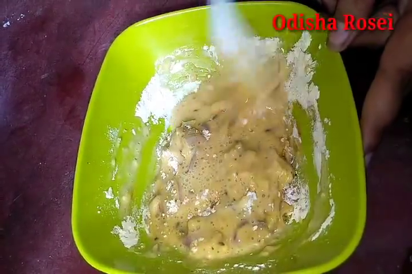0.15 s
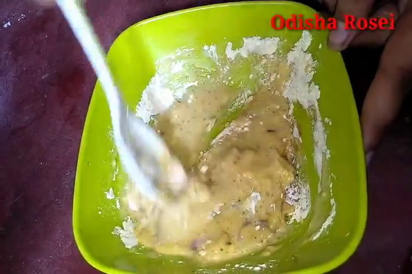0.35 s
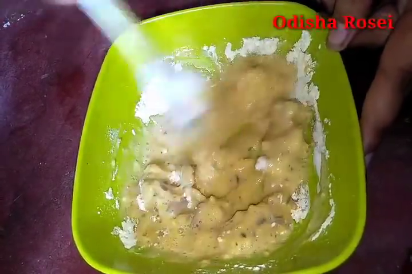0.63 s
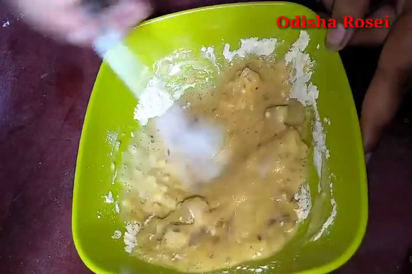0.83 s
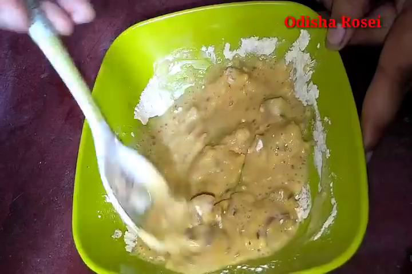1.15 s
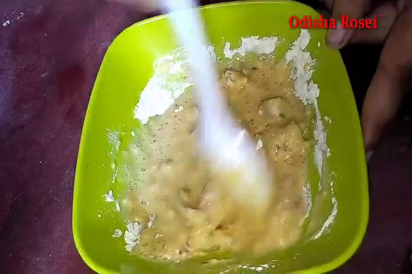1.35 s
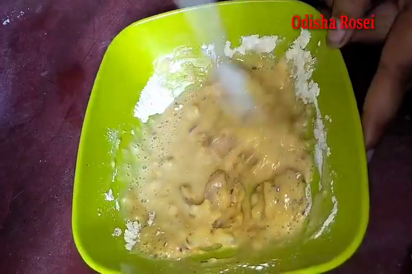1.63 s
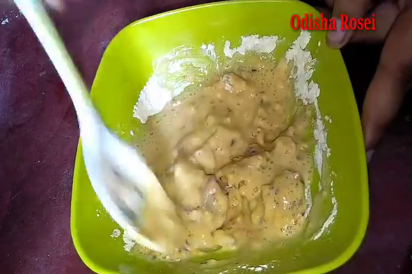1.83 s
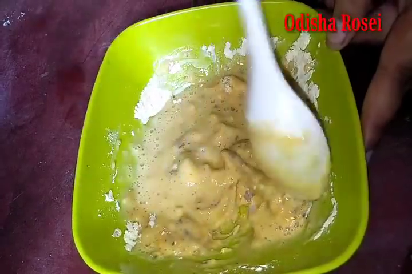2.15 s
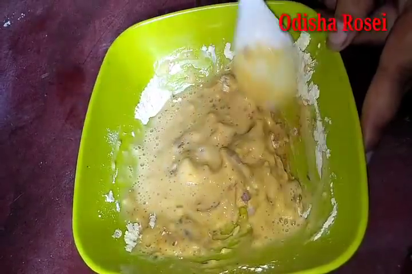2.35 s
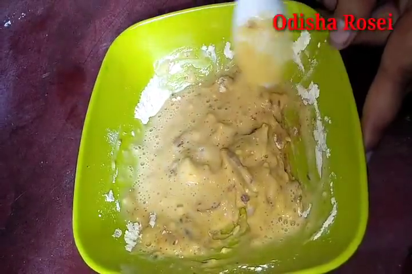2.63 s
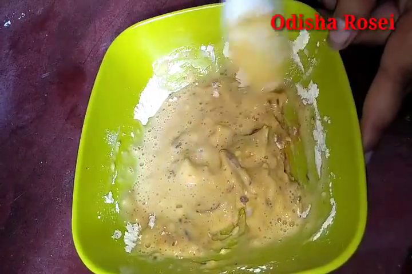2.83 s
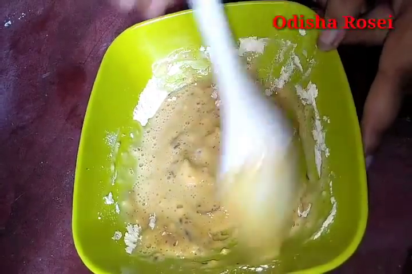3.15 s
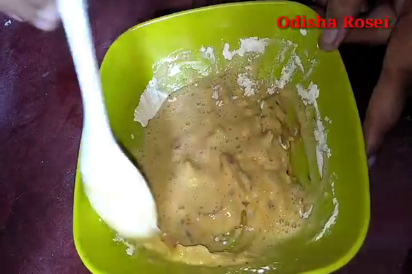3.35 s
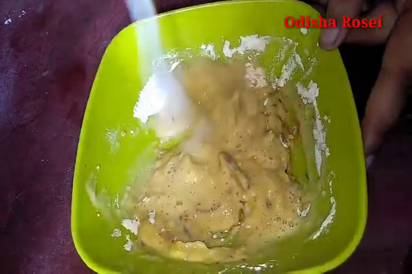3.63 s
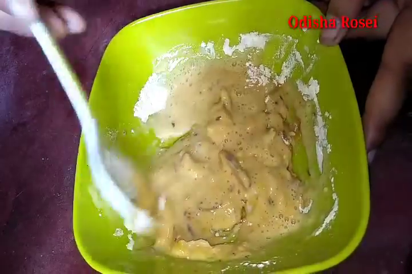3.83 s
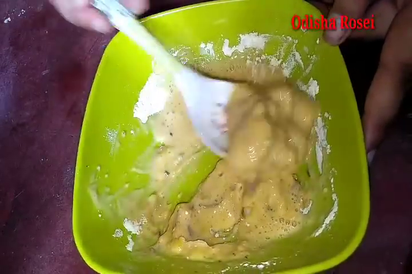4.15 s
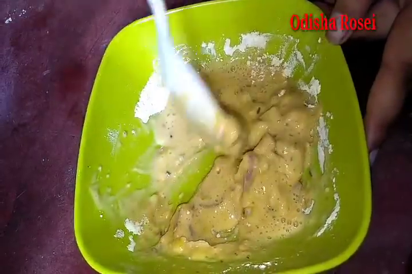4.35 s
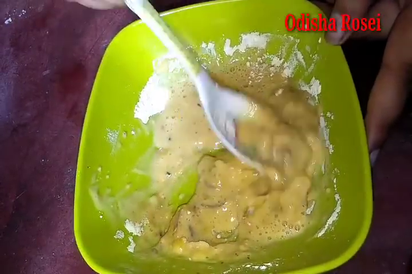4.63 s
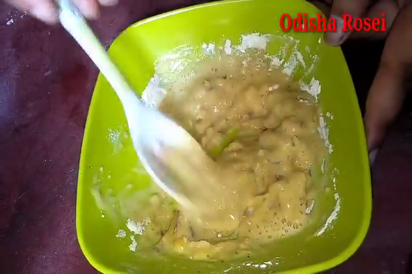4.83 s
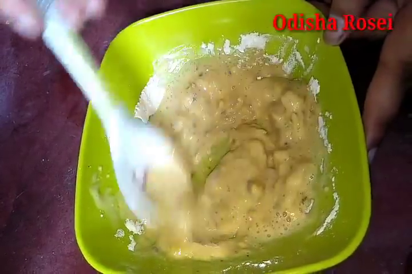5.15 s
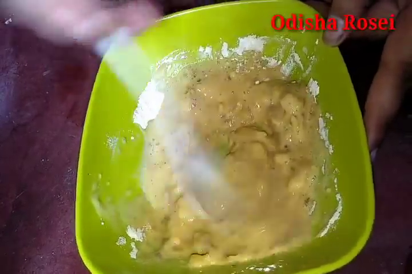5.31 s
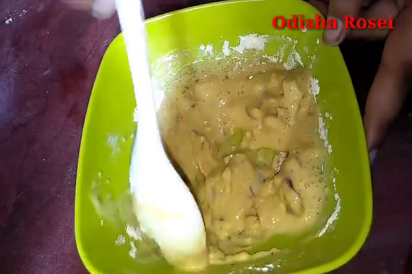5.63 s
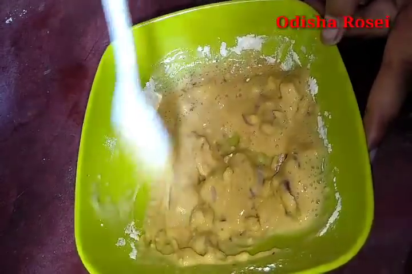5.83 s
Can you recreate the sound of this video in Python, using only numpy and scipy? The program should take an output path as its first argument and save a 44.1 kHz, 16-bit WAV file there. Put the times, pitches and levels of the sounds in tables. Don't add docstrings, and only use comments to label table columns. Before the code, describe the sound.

A plastic spoon stirs thick batter in a plastic bowl with dull thuds, sharp raps and sticky scrapes over a low room rumble.

```python
import sys
import numpy as np
from scipy import signal
from scipy.fft import rfft, irfft, next_fast_len
from scipy.io import wavfile
from scipy.ndimage import map_coordinates

SR = 44100
rng = np.random.default_rng(int(sys.argv[2]) if len(sys.argv) > 2 else 0)


def to_wav(sig):
    pcm = np.clip(np.atleast_2d(sig), -1, 1) * 32767
    pcm = np.round(pcm).astype(np.int16)
    wavfile.write(sys.argv[1], SR, pcm.T)


def gain_from_db(level_db):
    decades = np.asarray(level_db, float) / 20
    return 10 ** decades


N = 263788


def along(points, hz):
    f, v = np.transpose(points)
    return np.interp(np.log(hz + 1), np.log(f + 1), v)


def unit(x):
    return x / np.sqrt(np.mean(x ** 2) + 1e-20)


def curves(rows):
    s, *cols = np.transpose(rows)
    return [np.interp(np.arange(N) / SR, s, c) for c in cols]


def wobble(knots_per_s):
    knots = rng.standard_normal(int(N * knots_per_s / SR) + 4)
    return map_coordinates(knots, [np.arange(N) * knots_per_s / SR])


def filtered(x, response):
    m = next_fast_len(x.shape[-1] + 8192)
    spectrum = rfft(x, m) * response(np.fft.rfftfreq(m, 1 / SR))
    return irfft(spectrum, m)[..., :x.shape[-1]]


def noise(spectrum):
    return unit(filtered(rng.standard_normal(N), lambda hz: gain_from_db(along(spectrum, hz))))


def body(modes):
    low, high = modes[0][0] * 0.55, modes[-1][0] * 1.77

    def response(f):
        highpass = (1j * f / low) ** 2 / (1 - (f / low) ** 2 + 1.3j * f / low)
        lowpass = 1 / (1 - (f / high) ** 2 + 1.3j * f / high)
        total = 0
        for k, (centre, width, db) in enumerate(modes):
            damping = 1j * f * width
            total = total + (-1) ** k * gain_from_db(db) * damping / (centre * centre - f * f + damping)
        return (highpass * lowpass) ** 3 * total

    return response


# frequency in Hz, t60 in s.
KITCHEN_T60 = [(300, 0.28), (800, 0.25), (2100, 0.26), (5500, 0.16), (12000, 0.28)]
TAIL = 16384


def tails(count):
    hz, t, z = signal.stft(rng.standard_normal((count, TAIL)), SR, nperseg=256)
    decay = gain_from_db(-60 * t / along(KITCHEN_T60, hz)[:, None])
    tail = signal.istft(z * decay, SR, nperseg=256)[1][:, :TAIL]
    tail = tail * np.clip(np.arange(TAIL) / SR / 0.0015, 0, 1) ** 2
    return tail / np.linalg.norm(tail, axis=1, keepdims=True)


def in_kitchen(starts_s, dry, wet_db):
    dry = np.pad(dry, [(0, 0), (0, TAIL - dry.shape[1])])
    heard = dry + gain_from_db(wet_db) * signal.fftconvolve(dry, tails(count=len(dry)), axes=1)[:, :TAIL]
    out = np.zeros(N + TAIL)
    for s, one in zip(starts_s, heard):
        out[round(s * SR):][:TAIL] += one
    return out[:N]


# time in s, level in dB.
RUMBLE_SWELLS = [(0.03, -48), (0.49, -58), (0.51, -52), (1.5, -50.5), (1.6, -59.5), (2.04, -55.5),
                 (2.07, -49.5), (2.5, -55.5), (2.54, -50), (2.7, -59.5), (2.88, -52), (2.98, -59),
                 (3.57, -60), (4.37, -53.5), (4.93, -56.5), (5.03, -64), (5.06, -53), (5.95, -52)]
# frequency in Hz, density in dB per Hz.
DEEP_SPECTRUM = [(12, -26), (20, -18.5), (43, 0), (75, -7), (91, -4), (110, -5), (140, -36), (240, -120)]
HUM_SPECTRUM = [(41, -17.5), (70, -10), (102, 2.5), (129, 2), (161, 2), (188, -4.5), (220, -7),
                (314, -24.5), (343, -28), (420, -48), (550, -82.5), (920, -120)]
HISS_SPECTRUM = [(210, -48.5), (350, 0), (591, -6), (1920, -11.5), (2180, -10.5), (4110, -16), (5640, -15),
                 (6210, -38), (6830, -13), (7750, -16), (15600, -12.5)]
DEEP_DB, DEEP_FOLLOWS, HISS_DB = -57, 0.4, -75.5


def room_tone():
    hum_db, = curves(RUMBLE_SWELLS)
    deep_db = DEEP_DB + DEEP_FOLLOWS * (hum_db - hum_db.mean())
    deep = gain_from_db(deep_db) * unit(gain_from_db(2.1 * wobble(7.2)) * noise(DEEP_SPECTRUM))
    hum = gain_from_db(hum_db) * unit(gain_from_db(2.73 * wobble(16)) * noise(HUM_SPECTRUM))
    hiss = gain_from_db(HISS_DB + 0.86 * wobble(0.92)) * noise(HISS_SPECTRUM)
    return deep + hum + hiss


# time in s, peak in dB.
NEAR_SWELLS = [(0.17, -72.5), (1.4, -73), (1.55, -84.5), (1.93, -87), (3.401, -73.5), (4.01, -74.5),
               (5.52, -70.5)]
NEAR_REST_DB, NEAR_FADE_DB_PER_S = -86.5, 40


def near_insect_db():
    t = np.arange(N) / SR
    swells = [np.maximum(db - NEAR_FADE_DB_PER_S * abs(t - s), NEAR_REST_DB) for s, db in NEAR_SWELLS]
    return np.max(swells, axis=0)


# centre in Hz, width in Hz, level in dB.
FAR_INSECTS = [(6003, 80, -82.5), (7863, 90, -85.5), (11400, 240, -97.5)]
NEAR_HZ, NEAR_WIDTH_HZ = 6380, 110


def insects():
    out = 0
    for hz, width, db in FAR_INSECTS + [(NEAR_HZ, NEAR_WIDTH_HZ, near_insect_db())]:
        band = lambda f: 1 / (1 + ((f - hz) / width) ** 4)
        trill = unit(filtered(rng.standard_normal(N), band))
        out = out + gain_from_db(db + 3.9 * wobble(3.7) + 2.7 * wobble(30)) * trill
    return out


# time in s, pitch in Hz, level in dB, overtone in dB.
CHIRP = [
    (1.12, 2240, -103, -7),
    (1.135, 2500, -68.5, -4),
    (1.16, 2774, -56.5, -13),
    (1.2, 2753, -63.5, 3),
    (1.24, 2670, -67, -0.5),
    (1.29, 2690, -71, -9),
    (1.34, 2650, -77, -16),
    (1.42, 2600, -98, -10),
]


def bird():
    hz, db, over_db = curves(CHIRP)
    t = np.arange(N) / SR
    phase = 2 * np.pi * np.cumsum(.99 * hz * (1 + 0.058 * wobble(300))) / SR
    voice = np.sin(phase) + gain_from_db(over_db) * np.sin(2 * phase)
    voice = voice * gain_from_db(db + 2.4 * wobble(90))
    voice = voice * (t > CHIRP[0][0]) * (t < CHIRP[-1][0])
    return voice + 1.48 * signal.fftconvolve(voice, tails(count=1)[0])[:N]


# centre in Hz, width in Hz, level in dB.
BOTTOM_MODES = [(400, 150, 1.5), (537, 140, 6), (734, 142, 3.5), (956, 140, 2.5)]
WALL_MODES = [(1186, 240, 0.027), (1380, 210, 0), (1586, 120, 0.0047)]
RIM_MODES = [(2110, 230, 0.021), (2650, 120, 0.00068), (2950, 180, 0.0014)]
SPOON_MODES = [(4720, 415, -3), (5450, 220, -1), (6250, 620, 1.5), (8200, 2000, -12.5)]
SMACK_MODES = [(9900, 4200, -15), (11400, 1200, -4.5)]
# time in s, pressure in dB, height from -1 (bottom) to 1 (rim).
DRAG_PATH = [(0.0, -79, 0.61), (0.85, -72.5, -0.15), (1.1, -84, 0.4), (1.75, -86.5, -1.2), (2.5, -78, 0),
             (3.1, -77, -0.7), (3.25, -55, .3), (3.4, -60, 0.19), (3.5, -70.5, 1), (3.66, -82, -0.96),
             (3.95, -69.5, 0.86), (4.2, -79.5, 0.15), (5.09, -80.5, 0.67), (5.3, -59, 0.62),
             (5.48, -64.5, 1), (5.66, -70, 0), (5.8, -50, -0.45), (5.98, -66.5, -1)]
# level at mid height in dB, slope in dB per unit height.
HEIGHT_LEVELS = [
    (-1, -10.5),
    (-2, 7.5),
    (-6, 5.5),
    (-14.5, 4),
]


def drag(per_s=1500, scatter_db=2.5):
    out = 0
    pressure_db, height = curves(DRAG_PATH)
    groups = [BOTTOM_MODES, WALL_MODES + RIM_MODES, SPOON_MODES, SMACK_MODES]
    for (mid_db, slope_db), group in zip(HEIGHT_LEVELS, groups):
        db = pressure_db + mid_db + slope_db * height
        slips = (rng.random(N) < per_s / SR) * rng.standard_normal(N)
        slips = slips * gain_from_db(scatter_db * rng.exponential(size=N))
        smeared = slips + 4.0 * signal.fftconvolve(slips, tails(count=1)[0])[:N]
        out = out + gain_from_db(db - 10.5) * unit(filtered(smeared, lambda f: body(group)(f) ** 2))
    return out


# start in s, length in s, resonance in Hz, level in dB.
BOTTOM_RUBS = [(3.176, 0.018, 1014, -35.5), (0.634, 0.026, 780, -68), (0.686, 0.042, 885, -71.5),
               (0.772, 0.039, 850, -65.5), (0.935, 0.027, 460, -53.5), (1.902, 0.025, 920, -64),
               (1.905, 0.028, 372, -56.5), (2.5, 0.063, 340, -46), (2.86, 0.063, 266, -46.5),
               (3.378, 0.021, 502, -62.5), (3.385, 0.11, 918, -60), (3.48, 0.089, 456, -62),
               (3.487, 0.078, 850, -56.5), (3.709, 0.11, 726, -69), (3.742, 0.025, 537, -59),
               (3.82, 0.077, 730, -68), (3.99, 0.037, 407, -72), (4.144, 0.042, 400, -68),
               (4.808, 0.033, 510, -75), (5.198, 0.063, 916, -51.5), (5.22, 0.03, 622, -50.5),
               (5.41, 0.08, 990, -60.5)]
BOWL_WALL_RUBS = [(2.19, 0.066, 1600, -55.5), (0.159, 0.031, 1330, -51), (0.165, 0.038, 2160, -65),
                  (0.475, 0.047, 1484, -67), (0.483, 0.07, 2150, -77), (0.626, 0.031, 1525, -64),
                  (0.783, 0.15, 2170, -74.5), (0.836, 0.07, 1385, -70), (0.939, 0.076, 1460, -62),
                  (1.608, 0.083, 1427, -72), (2.057, 0.022, 1580, -74.5), (2.323, 0.022, 1380, -74),
                  (2.544, 0.057, 1880, -53.5), (2.643, 0.037, 2190, -71), (3.43, 0.22, 1480, -71),
                  (3.45, 0.1, 2150, -69), (3.52, 0.023, 1400, -53.5), (3.754, 0.025, 2100, -71.5),
                  (3.865, 0.15, 1574, -66.5), (3.868, 0.14, 2110, -72), (4.089, 0.016, 1565, -70.5),
                  (4.218, 0.14, 2146, -77.5), (4.716, 0.068, 1533, -72), (4.909, 0.05, 2175, -74.5),
                  (5.068, 0.06, 1530, -74), (5.113, 0.26, 2160, -80.5), (5.216, 0.041, 1360, -57.5),
                  (5.315, 0.32, 2160, -67.5), (5.779, 0.18, 2120, -61)]
BOWL_RIM_RUBS = [(5.621, 0.011, 3000, -36), (3.175, 0.016, 3104, -34.5), (2.553, 0.058, 2750, -64.5),
                 (3.2, 0.17, 3094, -60.5), (5.647, 0.11, 3200, -62), (0.159, 0.032, 2670, -55.5),
                 (0.47, 0.065, 2650, -67), (0.628, 0.079, 2650, -70.5), (0.854, 0.2, 3420, -81.5),
                 (0.938, 0.059, 2770, -67), (1.588, 0.033, 3170, -70.5), (1.909, 0.025, 2950, -65),
                 (2.188, 0.09, 3430, -74), (2.872, 0.028, 2230, -48.5), (3.404, 0.12, 3520, -69.5),
                 (3.497, 0.057, 2650, -59.5), (3.866, 0.062, 2780, -58), (4.084, 0.026, 3660, -71.5),
                 (4.285, 0.12, 2470, -84), (4.697, 0.17, 2390, -81), (4.962, 0.1, 2780, -80.5),
                 (5.041, 0.14, 2530, -79.5), (5.197, 0.12, 2830, -63.5), (5.309, 0.21, 2460, -67),
                 (5.869, 0.12, 2510, -67)]
SPOON_BODY_RUBS = [(0.165, 0.022, 5270, -58.5), (0.476, 0.052, 4870, -70.5), (1.264, 0.017, 9200, -74),
                   (1.316, 0.013, 4870, -66.5), (1.373, 0.011, 5070, -67), (1.302, 0.68, 11250, -84.5),
                   (2.206, 0.15, 4660, -72), (2.214, 0.057, 8440, -74.5), (2.523, 0.13, 4970, -70.5),
                   (3.195, 0.16, 8500, -84), (3.298, 0.32, 6400, -74.5), (3.387, 0.14, 11600, -75.5),
                   (3.423, 0.16, 4530, -69), (3.757, 0.03, 4510, -74), (3.859, 0.087, 4850, -69),
                   (3.863, 0.069, 6660, -61.5), (3.986, 0.019, 4790, -70), (4.602, 0.06, 6580, -68.5),
                   (4.717, 0.086, 11610, -74.5), (5.229, 0.06, 4400, -69.5), (5.621, 0.039, 6050, -60),
                   (3.485, 0.049, 4940, -64), (0.938, 0.049, 4600, -77.5), (2.194, 0.12, 11600, -78.5),
                   (2.517, 0.2, 11700, -84), (3.873, 0.16, 11700, -78), (5.752, 0.11, 11800, -75),
                   (5.31, 0.22, 5060, -74.5), (5.817, 0.13, 4640, -72.5)]
# width in Hz at the usual level, widening in dB per dB louder.
RESONANCE_WIDTHS = [
    (240, 0.02),
    (270, 0.6),
    (450, 0.3),
    (1100, 0.88),
]
USUAL_RUB_DB = -68


def rubs(per_s=2200, scatter_db=3.5, rise_s=0.0021):
    parts = [BOTTOM_RUBS, BOWL_WALL_RUBS, BOWL_RIM_RUBS, SPOON_BODY_RUBS]
    s, length, hz, db = np.concatenate(parts).T[:, :, None]
    usual, wider = np.repeat(RESONANCE_WIDTHS, [len(p) for p in parts], axis=0).T[:, :, None]
    width = usual * gain_from_db(wider * (db - USUAL_RUB_DB))
    t = np.arange(TAIL * 3 // 4) / SR
    shape = (len(s), len(t))
    slips = (rng.random(shape) < per_s / SR) * rng.standard_normal(shape)
    slips = slips * gain_from_db(scatter_db * rng.exponential(size=shape))
    stroke = (1 - np.exp(-t / rise_s)) * np.clip(1 - (t / length) ** 2, 0, 1)
    resonance = lambda f: (1j * f * width / (hz * hz - f * f + 1j * f * width)) ** 3
    sung = filtered(slips * stroke, resonance)
    rms = np.sqrt(np.sum(sung ** 2, axis=1, keepdims=True) / (length * SR) + 1e-20)
    return in_kitchen(s[:, 0], gain_from_db(db - 2.5) * sung / rms, wet_db=-4.0)


# start in s, peak in dB, wall in dB against the bottom, hardness in dB.
THUD_BLOWS = [(0.151, -40.5, -10, -1), (0.931, -44.5, -47, 5), (1.593, -40, -43, 1), (2.176, -39.5, 5, -24),
              (2.501, -31.5, -17, 8), (2.511, -29.5, -6.5, -17), (2.523, -32, -7.5, 1),
              (2.847, -34, -16, -15.5), (2.857, -17.5, -2.5, -5), (2.881, -30, -14.5, 15),
              (2.889, -35, 7, -29), (2.894, -35.5, -15.5, -46), (5.201, -57, -28, 17),
              (5.305, -35, -12, -12.5), (5.755, -28, -4, 9), (5.848, -37.5, -3.5, 11)]
THUD_RIM_DB, THUD_SPOON_DB, THUD_TIP_DB, THUD_SMACK_DB = -23, -31, -47.5, -44
# start in s, peak in dB, height as dB of rim over bottom, spoon ring in dB.
RAP_BLOWS = [(0.945, -51, 11, -18), (2.223, -56.5, -2, 0.5), (2.565, -53.5, -1, -1), (2.654, -51, 22, -11),
             (3.175, -17.5, 8, -8.5), (3.299, -43.5, 21, -11), (3.317, -49, 16, -10),
             (3.399, -53.5, 16, -1.5), (3.528, -55.5, 7, -3), (5.357, -55.5, 1.5, 5), (5.408, -50, 2, 0.5),
             (3.433, -59.5, 4, 7.5), (5.428, -57, -2, 5), (5.622, -19, 8.5, -9.5)]
RAP_DEEP_DB, RAP_WALL_SHARE, RAP_WALL_DB, RAP_SMACK_DB = -6, 0.93, 2.5, -16.5
TIP_GROWS = 0.18
# start in s, peak in dB, rim in dB, wet smack in dB.
EDGE_TICKS = [
    (1.927, -58, -30, 5),
    (1.941, -51.5, -42, -3.5),
    (1.991, -64.5, -20, 2.5),
    (2.291, -66.5, -10, 4.5),
    (3.351, -56, -1, -11),
    (3.867, -47.5, -16, -7),
    (5.295, -32.5, -3, -22.5),
    (5.721, -46, -0.5, -5),
    (2.754, -67.5, -23, -21.5),
]
TICK_BOTTOM_DB, TICK_WALL_DB = -23.5, -14


def contacts():
    s, db, wall, hard = np.transpose(THUD_BLOWS)
    thuds = [s, db - 9, db - 5, db + wall, db + THUD_RIM_DB + hard,
             db + THUD_SPOON_DB + 0.7 * hard, db + THUD_TIP_DB + 0.7 * hard,
             db + THUD_SMACK_DB + 0.8 * hard]
    s, db, height, spoon = np.transpose(RAP_BLOWS)
    raps = [s, db - height + RAP_DEEP_DB, db - height,
            db + RAP_WALL_DB - RAP_WALL_SHARE * height, db, db + spoon,
            db + spoon + TIP_GROWS * (db - db.max()), db + spoon + RAP_SMACK_DB]
    s, db, rim, smack = np.transpose(EDGE_TICKS)
    bottom = db + rim + TICK_BOTTOM_DB
    ticks = [s, bottom, bottom, db + rim + TICK_WALL_DB, db + rim, db - 7, db + 1, db + smack]
    return np.c_[thuds, raps, ticks].T


def knocks(contact_s=0.0072, softer=0.28):
    rows = contacts()
    level_db = rows[:, 1:]
    strength_db = level_db.max(axis=1, keepdims=True)
    t = np.arange(TAIL // 8) / SR
    lasting_s = contact_s * gain_from_db(-softer * (strength_db - strength_db.max()))
    rattle = rng.standard_normal((len(rows), len(t))) * gain_from_db(-60 * t / lasting_s)
    rattle *= 1 - np.exp(-t / lasting_s / 0.059)
    rattle += 3.2 * contact_s / lasting_s * np.exp(-(t - .0003) ** 2 / .00002 ** 2)
    groups = [BOTTOM_MODES[:2], BOTTOM_MODES[2:], WALL_MODES, RIM_MODES,
              SPOON_MODES[:2], SPOON_MODES[2:], SMACK_MODES]
    dry = 0
    for group, db in zip(groups, level_db.T):
        ring = filtered(rattle, body(group))
        dry = dry + gain_from_db(db)[:, None] * ring / np.abs(ring).max(axis=1, keepdims=True)
    return in_kitchen(rows[:, 0] + .001, gain_from_db(1) * dry, wet_db=-3.0)


def scene():
    return (room_tone() + insects() + bird() + drag() + rubs() + knocks())[None]


def roll_off(x):
    return signal.sosfilt(signal.butter(12, 16340, fs=SR, output="sos"), x)


def record(dry):
    top_hz = 15550
    mix = filtered(dry, lambda hz: hz < top_hz)
    return roll_off(mix)


dry = scene()
out = record(dry)
to_wav(out)
```